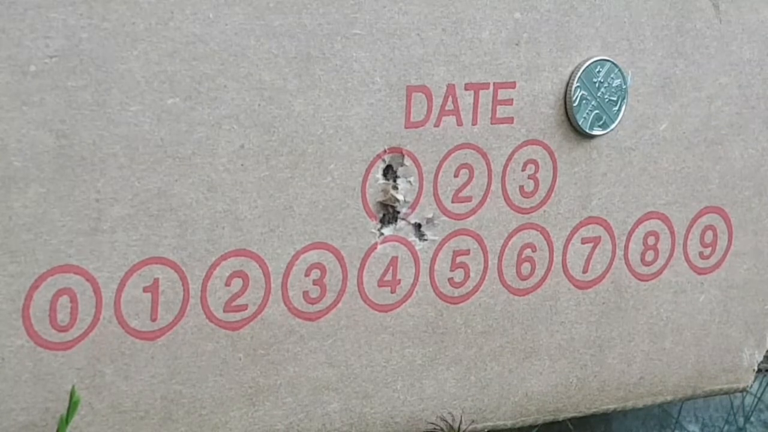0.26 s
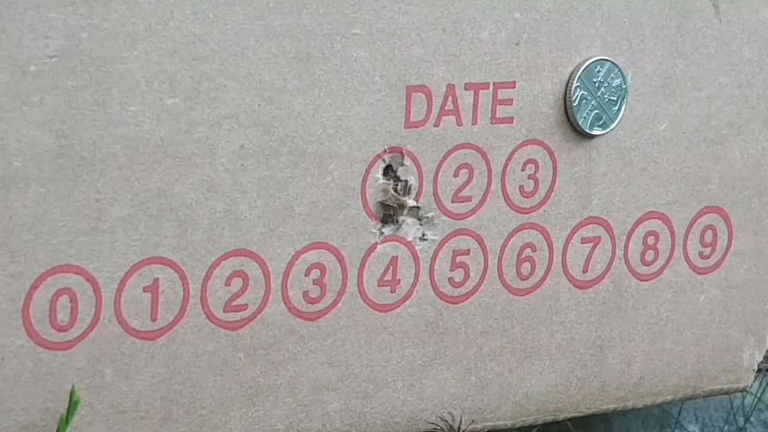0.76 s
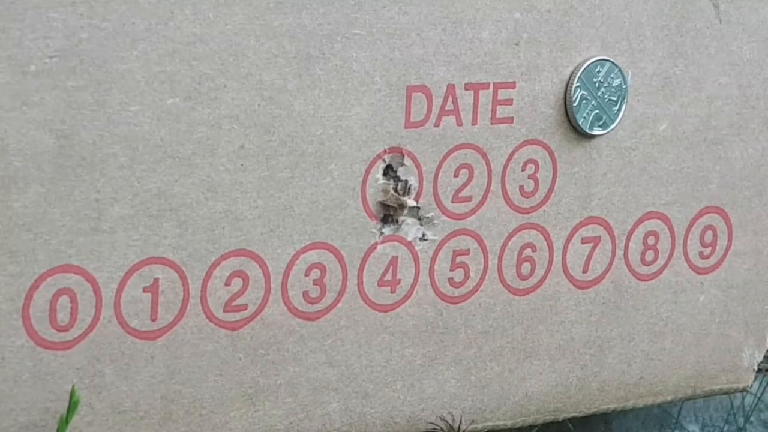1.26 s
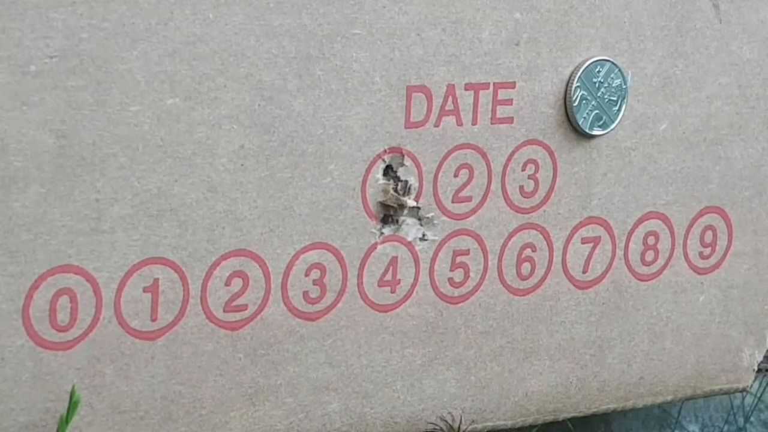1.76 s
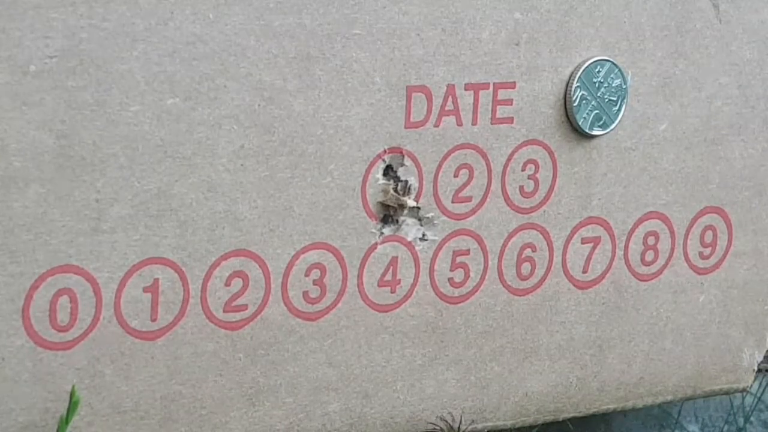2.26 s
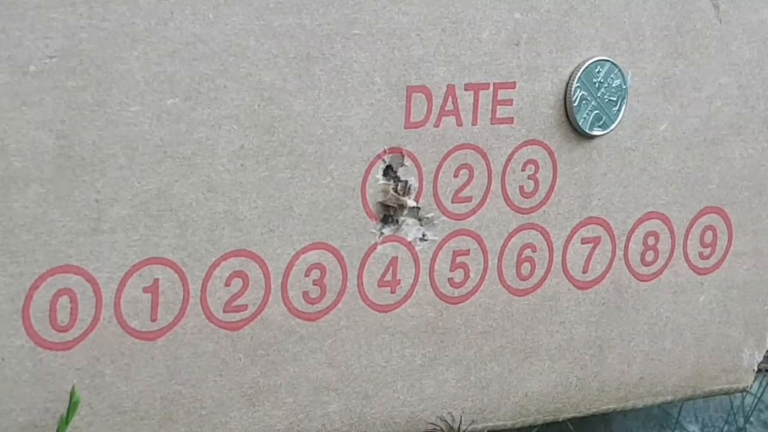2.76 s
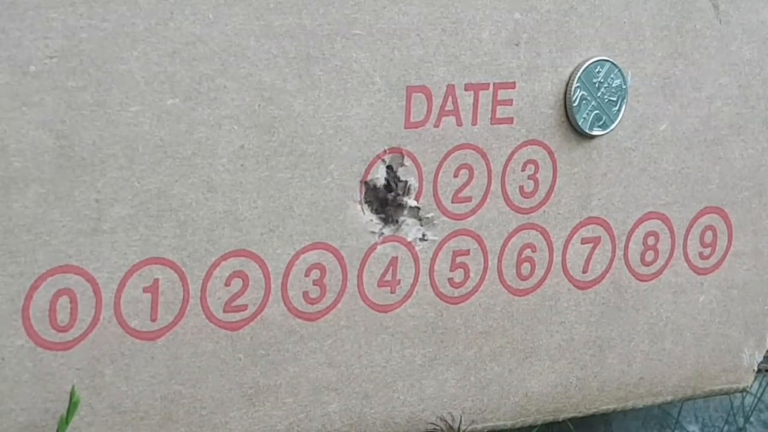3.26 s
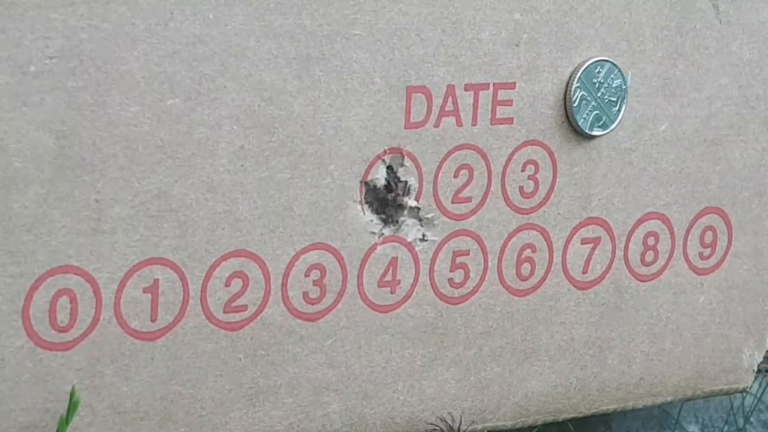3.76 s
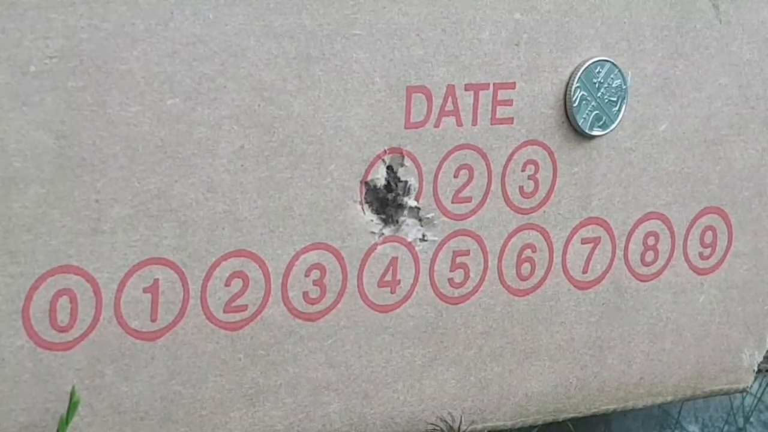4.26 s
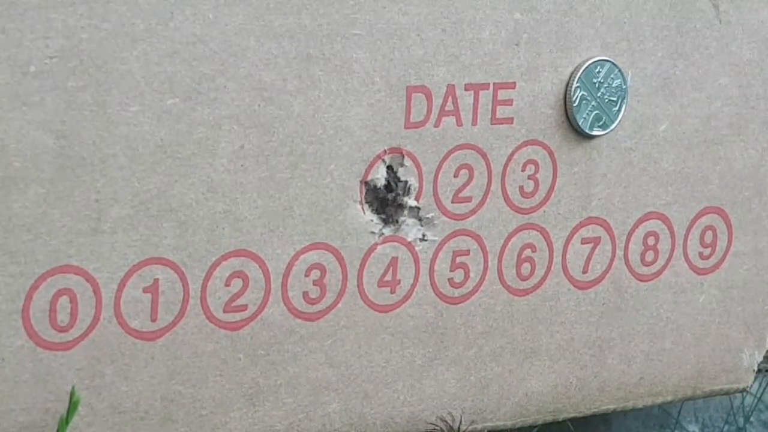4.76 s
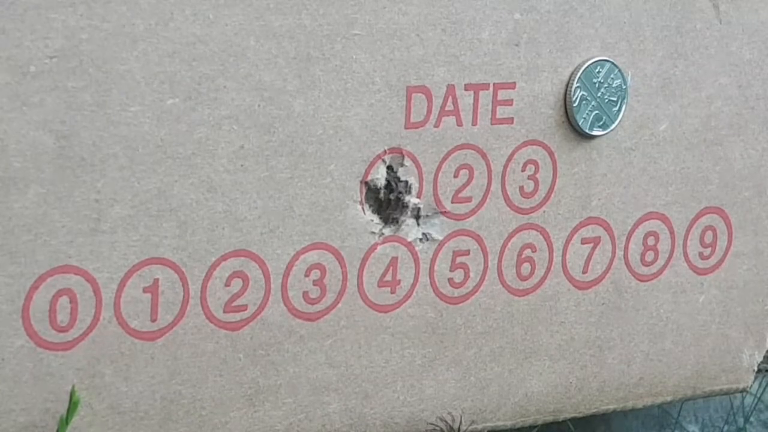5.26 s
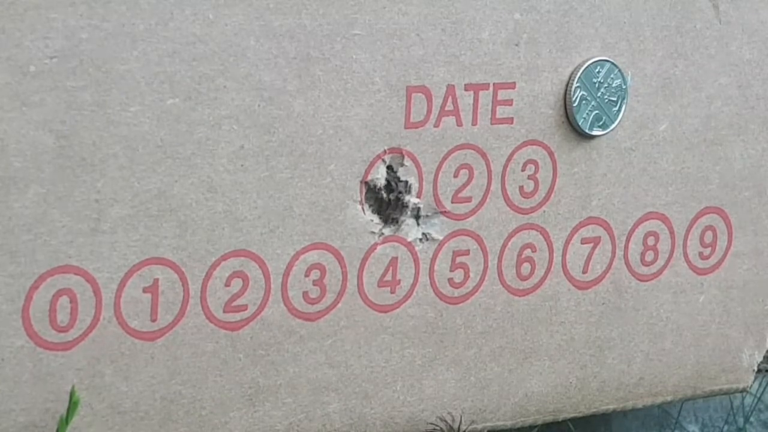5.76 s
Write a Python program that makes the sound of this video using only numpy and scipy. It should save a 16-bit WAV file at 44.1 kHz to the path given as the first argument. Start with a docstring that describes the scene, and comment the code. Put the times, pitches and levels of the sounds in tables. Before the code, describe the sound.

A quiet yard with distant road wash. A far air rifle pops and its pellet cracks into a nearby box with a boxy, overloaded smack, then rattles in a quick run of taps. A second shot brings fewer, more spaced knocks; a third ends with one clear knock and tiny ticks. Short outdoor reverb; the close recorder ducks the background after the blows.

```python
"""Outdoors, close to a cardboard box, three air rifle shots arrive over faint traffic and a far drone.
Each far muzzle report is a decaying noise puff with an echo; the pellet's hiss swells, then cuts off.
Box modes, torn-card noise and a hollow boom make each slap; short modal knocks make the pellet's bounces.
Random taps give the yard's reverb. The slap overloads the recorder, whose gain control ducks the traffic."""
import sys
import numpy as np
from scipy import signal
from scipy.fft import rfft, irfft
from scipy.io import wavfile
from scipy.ndimage import uniform_filter1d

SR = 44100
rng = np.random.default_rng(int(sys.argv[2]) if len(sys.argv) > 2 else 0)


def pcm_store(signal):
    """Save signal as 16-bit PCM."""
    levels = np.round(np.clip(np.atleast_2d(signal), -1, 1) * 32767)
    wavfile.write(sys.argv[1], SR, levels.astype(np.int16).T)


N = 265482

# Levels are set ahead of the recorder; a positive lean is to the left.
# Far road wash: [f/Hz, relative level/dB per Hz]
TRAFFIC_SPECTRUM = [(12, -29), (20, -7), (27, -21.5), (64, -1.5), (144, -10.5), (207, -2), (306, -5.5),
                    (383, 1.5), (520, -1.5), (790, 0.5), (1270, -6), (1820, -9.5), (3180, -20.5),
                    (8910, -32), (15600, -33.5)]
# Likeness of the road wash at the two microphones: [f/Hz, likeness 0-1]
TRAFFIC_LIKENESS = [(60, 0.81), (200, 0.3), (640, 0.25), (1400, 0.15), (3100, 0.09), (6800, 0.088),
                    (9000, 1)]
# Stereo lean of the road wash: [f/Hz, lean/dB]
TRAFFIC_LEAN = [(60, 1.5), (110, 0.5), (200, -2.5), (380, -3), (700, -4), (1290, -6), (2380, -6.0),
                (4400, -5.5), (8120, -8), (15000, 6.5)]
# Level curve of the wash, mostly its lower part: dips after the second and third shots: [t/s, level/dB]
TRAFFIC_LEVEL = [(0, 1), (.7, 3), (1.3, 0.5), (2.001, 2), (3, 3), (3.5, -4.5), (3.9, 4), (4.4, 3), (5, 2.5),
                 (5.6, -2.5), (6.02, 0.5)]
# Muzzle reports: [t/s, level/dB, lean/dB]
REPORTS = [(0.671, -29, -3), (3.068, -28.5, 0.5), (5.068, -27.5, -5)]
# Puff from the muzzle: [f/Hz, relative level/dB per Hz]
MUZZLE_SPECTRUM = [(120, -37.5), (200, -4), (462, -0.5), (1430, -22), (2380, -8), (3190, -11), (6370, -6),
                   (7100, 1), (9510, -15), (15600, -7.5)]
# Echo of the report off far trees and walls: [f/Hz, relative level/dB per Hz]
ECHO_SPECTRUM = [(300, -14.5), (1000, -10), (2000, -2), (4000, -0.5), (8000, -7.5), (11000, -10.5),
                 (15500, -13)]
# Pellet strikes: [t/s, blow level/dB, flight hiss level/dB, lean/dB, tearing decay/s,
# hollow boom level/dB relative to the blow]
STRIKES = [(.7190, 3, -16.5, -2.5, 0.0036, -19), (3.1157, 6, -17.5, -3.5, 0.0025, -18.5),
           (5.1172, 4, -17.5, -2.5, 0.0045, -22.5)]
# Pellet hiss, also the treble tick of a bounce: [f/Hz, relative level/dB per Hz]
HISS_SPECTRUM = [(350, -33), (600, -17.5), (1060, -9.5), (1960, -11.5), (3520, -10), (4500, -12),
                 (7980, -5.5), (11400, -10), (15600, -3)]
# Decay of the yard's reverb: [f/Hz, t60/s]
YARD_DECAY = [(250, 0.61), (1000, 0.12), (3000, 0.47), (7000, 0.48), (14000, 0.069)]
# Tone of the yard's reverb: [f/Hz, relative level/dB]
YARD_COLOUR = [(200, -9.5), (800, -19), (2200, -8), (5000, 0.5), (9000, 0.5), (15000, 8)]
# Modes of the box before damping and weighting: [f/Hz, relative level/dB, t60/s]
BOX_MODES = [(342, -8.5, 0.1), (400, -10, 0.1), (488, -15, 0.08), (624, -14.5, 0.066), (685, -10, 0.037),
             (743, -10.5, 0.057), (860, -7.5, 0.021), (895, -9, 0.063), (1022, -4.5, 0.034),
             (1168, 2, 0.036), (1153, 6.5, .03), (1183, -0.5, 0.017), (1328, 4, 0.025),
             (1843, -10.5, 0.039), (2030, -10, 0.01)]
# Tearing card: [f/Hz, relative level/dB per Hz]
CRACK_SPECTRUM = [(240, -38), (400, -14.5), (587, -9.5), (1240, -6.5), (1710, -11), (2030, -5),
                  (3160, -16.5), (5010, -21), (5490, -21.5), (7930, -25), (15600, -24)]
# Bounces of the spent pellet: [t/s, level/dB, panel name, scuff level/dB and treble tick level/dB,
# both relative to the bounce]
BOUNCES = [(.784, -18, "wall", -11, -37), (.885, -18.5, "wall", -23, -45), (.915, -19.5, "wall", -35, -34),
           (0.976, -19, "wall", -21.5, -30), (1.02, -33, "flap", -23, -30), (1.064, -38, "wall", -13, -26),
           (1.112, -27.5, "wall", -11.5, -43), (1.144, -38, "flap", -19, -31),
           (1.165, -36.5, "flap", -22, -7), (1.203, -44, "wall", -19, -30),
           (3.135, -15, "edge", -15, -24.5), (3.331, -17, "floor", -3.5, -12),
           (3.596, -8.5, "floor", -10.5, -33.5), (3.691, -29.5, "floor", -12, -38),
           (3.727, -35.5, "floor", -5.5, -35), (3.736, -33, "floor", -6, -40),
           (3.754, -33.5, "floor", -24.5, -43), (3.784, -35.5, "floor", -17.5, -42),
           (5.345, -9, "edge", -13.5, -24), (5.418, -30.5, "floor", -15, -33),
           (5.453, -36.5, "floor", -21, -35), (5.463, -41, "edge", -11, -35),
           (5.473, -34.5, "floor", -19, -37), (5.508, -39, "edge", -16, -35)]
# Panels the pellet lands on, by name: [pitch f/Hz, spread/octaves, hum level/dB relative to the bounce,
# slap-back level/dB relative to the knock, lean/dB]
PANELS = {"wall": (615, .26, -15.5, -7, -2.3), "flap": (700, .17, -12, -14, 0.5),
          "floor": (480, .18, -27, -22, -2.5), "edge": (690, 0.7, -25, -9, -3.5)}
# Lead scraping card: [f/Hz, relative level/dB per Hz]
SCUFF_SPECTRUM = [(530, -34), (900, -4.5), (1640, -9), (2160, -7.5), (2970, -17.5), (3820, -28),
                  (5830, -39.5), (9000, -40.5), (11700, -70), (19800, -120)]
# Faint far drone: [t/s, f/Hz, level/dB]
DRONE = [(1.9, 212, -78), (2.3, 211.4, -59), (2.7, 206, -65.5), (3.05, 206, -59), (3.8, 216, -55.5),
         (4.2, 216.8, -75), (4.6, 224, -86)]

TRAFFIC_DB = -46.5  # overall rms
LATE_S = .0005  # the road wash below 7.5 kHz reaches the left microphone later
BOOM_HZ, BOOM_T60_S = 190, .19  # the air inside the box
HUM_HZ, HUM_T60_S = 251, 0.15  # the widest wall
SLAP_S = .0054  # a knock returns from the far wall of the box
FIRM_RAD = .3  # random spread of the starting phases of a bounce
MEMORY_S, THRESHOLD_DB, SLOPE, RANGE_DB, KNEE_DB = .11, -49.5, 0.95, 19.5, 17  # gain control
FOLLOW_S, SETTLE_S, MAKEUP_DB = 0.063, 0.13, 4.0
EDGE_HZ = 15700  # top of the recorder's band


def gain_of(db):
    """Turns decibels into an amplitude factor."""
    return 10 ** (np.asarray(db) / 20)


def evened(x):
    """Brings a signal to rms 1."""
    return x / np.sqrt(np.mean(x ** 2) + 1e-20)


def read(points, hz):
    """Reads a curve between its points along a logarithmic pitch axis."""
    f, value = np.transpose(points)
    return np.interp(np.log(hz + 1), np.log(f + 1), value)


def add(mix, s, sound, lean_db):
    """Places a two-channel sound at time s, leaning left or right."""
    part = mix[:, round(s * SR):][:, :sound.shape[1]]
    leaning = sound * gain_of([[lean_db / 2], [-lean_db / 2]])
    part += leaning[:, :part.shape[1]]


def noise(spectrum, count, same):
    """Two channels of coloured noise, rms 1, alike by the share same."""
    a, b = rng.standard_normal((2, count))
    same = np.clip(same, 0, 1)
    pair = np.array([a, same * a + np.sqrt(1 - same ** 2) * b])
    colour = gain_of(read(spectrum, np.fft.rfftfreq(count, 1 / SR)))
    return evened(irfft(rfft(pair) * colour, count))


def traffic():
    """Far road wash: random short-time spectra with faint patches, under a level curve."""
    frames, hz = N // 256 + 5, np.fft.rfftfreq(1024, 1 / SR)
    a, b, c, d, patches = rng.standard_normal((frames, 513, 5)).T
    patches = uniform_filter1d(patches, 10, 0)  # across pitch
    patches = .7 * evened(uniform_filter1d(patches, 20, 1))  # across time, in dB
    same = np.clip(read(TRAFFIC_LIKENESS, hz), -1, 1)[:, None]
    left = a + 1j * b
    z = np.array([left, same * left + np.sqrt(1 - same ** 2) * (c + 1j * d)])
    # no delay above 7.5 kHz, where both channels are nearly alike
    z[0] *= np.exp(-2j * np.pi * hz * LATE_S * (hz < 7500))[:, None]
    lean = read(TRAFFIC_LEAN, hz)[:, None] / 2
    level_db = np.interp(np.arange(frames) * 256 / SR, *np.transpose(TRAFFIC_LEVEL))
    curve_db = np.outer(1 / (1 + (hz / 3500) ** 2), level_db)  # mostly the lower part
    z *= gain_of(read(TRAFFIC_SPECTRUM, hz)[:, None] + patches + curve_db + np.array([lean, -lean]))
    wash = signal.istft(z, nperseg=1024, noverlap=768)[1][:, :N]
    return gain_of(TRAFFIC_DB) * evened(wash)


def report():
    """A sharp puff from the far muzzle, smeared by the ground, then a smooth far echo."""
    t = np.arange(32768) / SR
    fall = np.exp(-t / 0.0063) + gain_of(-4.0) * np.exp(-t / 0.081)  # sharp puff, then ground smear
    puff = noise(MUZZLE_SPECTRUM, count=len(t), same=0.69) * fall
    swell = np.exp(-t / 0.07) * (1 - np.exp(-t / 0.016))
    echo = gain_of(-6.5) * noise(ECHO_SPECTRUM, count=len(t), same=.3) * swell
    return (puff + echo) * np.minimum(t / 0.00063, 1)


def flight(hiss_db):
    """The wake of the pellet grows from about the report on, as it nears, and stops just after impact."""
    t = np.arange(-2048, 200) / SR  # impact at 0
    nearness = 1 / (1 + (np.minimum(t + 0.0006, 0) / .012) ** 2)
    stop = np.clip(-t / 0.0053 + 1, 0, 1)
    return gain_of(hiss_db) * noise(HISS_SPECTRUM, count=len(t), same=0.092) * nearness * stop


def yard(x):
    """Sparse taps of random sign from fences and walls, each band dying at its own speed."""
    taps = np.zeros((2, SR))
    at = np.arange(300, SR - 20, 20) + rng.integers(0, 20, (2, (SR - 301) // 20))
    np.put_along_axis(taps, at, rng.choice([-1., 1.], at.shape), 1)
    hz, t, z = signal.stft(taps, SR, nperseg=256)
    fall_db = 60 * t / read(YARD_DECAY, hz)[:, None]
    z = z * gain_of(read(YARD_COLOUR, hz)[:, None] - fall_db)
    tail = signal.istft(z, SR, nperseg=256)[1]
    return signal.fftconvolve(x, tail / np.linalg.norm(tail[0]), axes=1)[:, :N]


def ring(weights, rise_s, step, scatter, damping=1):
    """The box answering a blow: neighbouring modes start a step apart in phase, so the sound swells in."""
    hz, db, t60 = np.transpose(BOX_MODES)[:, :, None]
    t = np.arange(16384) / SR
    count = len(BOX_MODES)
    sides = np.array([[1, 0.39], [1, -0.65]])  # phase scatter: a shared part and a part that differs
    start = step * np.arange(count) + scatter * (sides @ rng.standard_normal((2, count)))
    swing = np.sin(2 * np.pi * hz * t + start[..., None])
    fall = gain_of(db - 60 * damping * t / t60)
    body = (weights[:, None] * fall * swing).sum(1) * (1 - np.exp(-t / rise_s))
    return body / abs(body).max()


def low_tone(hz, db, t60, rise_s, count):
    """A low mode that swells in and dies away."""
    t = np.arange(count) / SR
    return gain_of(db - 60 * t / t60) * (1 - np.exp(-t / rise_s)) * np.sin(2 * np.pi * hz * t)


def strike(blow_db, tear_s, boom_db):
    """All modes of the box ring, under the crack and rustle of tearing card; the air inside booms."""
    body = ring(np.ones(len(BOX_MODES)), rise_s=0.00017, step=2.8, scatter=0.93, damping=0.84)
    t = np.arange(body.shape[1]) / SR
    body *= 0.55 + 1.4 * np.exp(-(t / 0.0042) ** 2)  # the struck panel sheds most of its swing at once
    jerks = uniform_filter1d(rng.standard_normal(len(t)), 50)
    fibres = gain_of(3.5 * evened(jerks))  # card rips in small jerks
    tearing = np.exp(-t / tear_s) + gain_of(-15.5) * np.exp(-t / 0.021)  # crack, then rustle
    force = fibres * tearing * np.minimum(t / 0.0011, 1)
    crack = gain_of(-4) * noise(CRACK_SPECTRUM, count=len(t), same=0.45) * force
    boom = low_tone(BOOM_HZ, boom_db, BOOM_T60_S, 0.019, count=len(t))
    return gain_of(blow_db) * (body + crack + boom)


def bounce(hz, spread, scuff_db, hum_db, tick_db, slap_db):
    """A light knock wakes mostly the modes near the pitch of the panel it lands on."""
    mode_hz, mode_db = np.transpose(BOX_MODES)[:2]
    octaves = np.log2(mode_hz / hz)
    reach = np.where(octaves > 0, 1.5, 1) * max(spread, .1)  # further upward
    near = np.exp(-.5 * (octaves / reach) ** 2)
    dryness = 1.9 + 3.3 * spread  # broad knocks are drier
    knock = ring(near / gain_of(mode_db), rise_s=0.00087, step=1.2, scatter=FIRM_RAD, damping=dryness)
    t = np.arange(2048) / SR
    scuff = noise(SCUFF_SPECTRUM, count=len(t), same=.7) * np.exp(-t / 0.0049)
    knock[:, :len(t)] += gain_of(scuff_db) * scuff
    late = round(SLAP_S * SR)
    knock[:, late:] += gain_of(slap_db) * knock[:, :-late]
    flick = np.exp(-t / 0.0018) * (1 - np.exp(-t / .0008))
    tick = noise(HISS_SPECTRUM, count=len(t), same=0.75) * flick
    knock[:, :len(t)] += gain_of(tick_db) * tick
    low_cut = signal.butter(2, 320, "high", fs=SR, output="sos")
    thin = signal.sosfilt(low_cut, knock)  # small lead moves little air
    return thin + low_tone(HUM_HZ, hum_db, HUM_T60_S, 0.002, count=knock.shape[1])


def drone():
    """A weak low tone, blurred by a slow random wobble in pitch."""
    s, hz, db = np.transpose(DRONE)
    t = np.arange(N) / SR
    wobble = evened(uniform_filter1d(rng.standard_normal(N), 3000))
    turns = np.cumsum(np.interp(t, s, hz) + 6.0 * wobble) / SR  # wobble of 6 Hz rms
    level = gain_of(np.interp(t, s, db, left=-120, right=-120))
    return level * np.sin(2 * np.pi * turns)


def scene():
    """Lays shots and bounces dry, sends both to the yard and adds the distant bed."""
    shots, rattle = np.zeros((2, 2, N))
    for s, db, lean_db in REPORTS:
        add(shots, s, gain_of(db) * report(), lean_db)
    for s, blow_db, hiss_db, lean_db, tear_s, boom_db in STRIKES:
        add(shots, s - 2048 / SR, flight(hiss_db), lean_db)
        add(shots, s, strike(blow_db, tear_s, boom_db), lean_db)
    for s, db, panel, scuff_db, tick_db in BOUNCES:
        hz, spread, hum_db, slap_db, lean_db = PANELS[panel]
        knock = bounce(hz, spread, scuff_db, hum_db, tick_db, slap_db)
        add(rattle, s, gain_of(db) * knock, lean_db)
    reverb = yard(gain_of(-13.5) * shots + gain_of(-17.0) * rattle)
    return shots + rattle + reverb + traffic() + drone()


def lag(x, seconds, start=0.):
    """One-pole smoothing with a starting value."""
    r = np.exp(-1 / (seconds * SR))
    return signal.lfilter([1 - r], [1, -r], x, zi=[start])[0]


def record(dry):
    """Overload, then a sluggish gain control that remembers loud power, then the band limit."""
    loud = np.tanh(dry)
    memory = lag((loud ** 2).mean(0), MEMORY_S)
    wanted_db = SLOPE * 10 * np.log10(1 + memory / gain_of(THRESHOLD_DB) ** 2)
    wanted_db = RANGE_DB * np.tanh(wanted_db / KNEE_DB)  # limited range: it holds low, then lets go
    follow_db = lag(wanted_db, FOLLOW_S, start=11.0)  # starts ducked, as if recovering from an earlier shot
    duck_db = lag(follow_db, SETTLE_S, start=6.2)
    out = loud * gain_of(MAKEUP_DB - duck_db)
    band = signal.firwin(511, EDGE_HZ, window=("kaiser", 9), fs=SR)
    return signal.oaconvolve(out, band[None], "same")


dry = scene()
out = record(dry)
pcm_store(out)
```